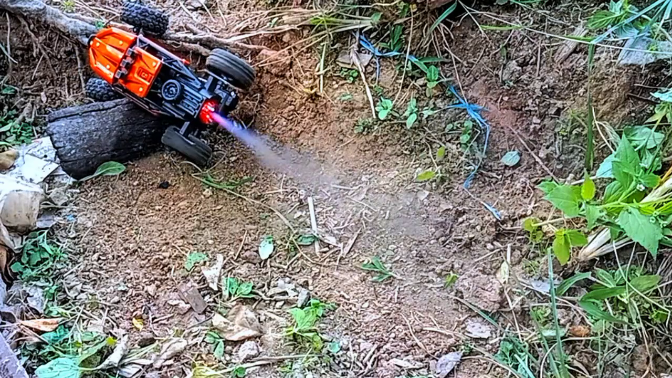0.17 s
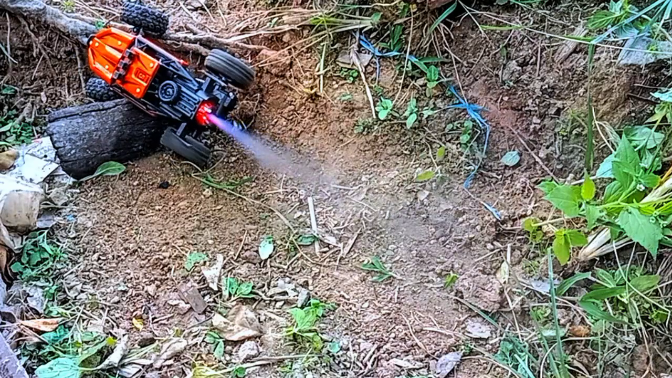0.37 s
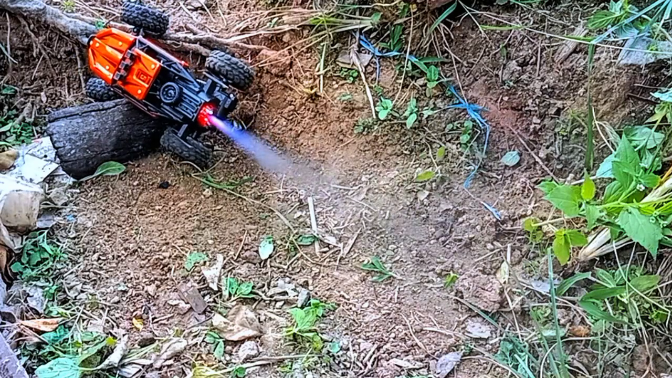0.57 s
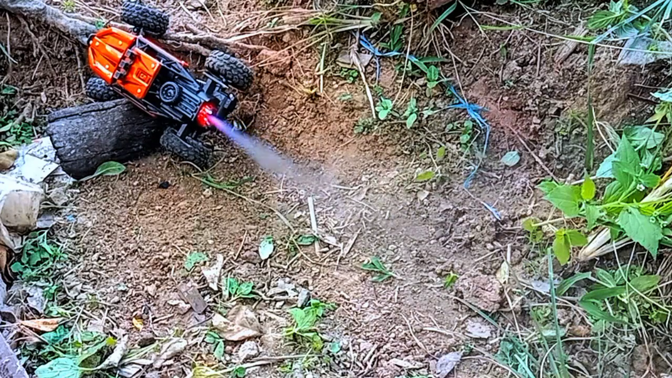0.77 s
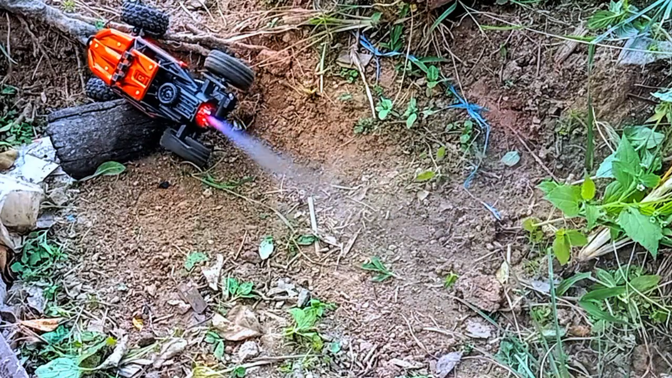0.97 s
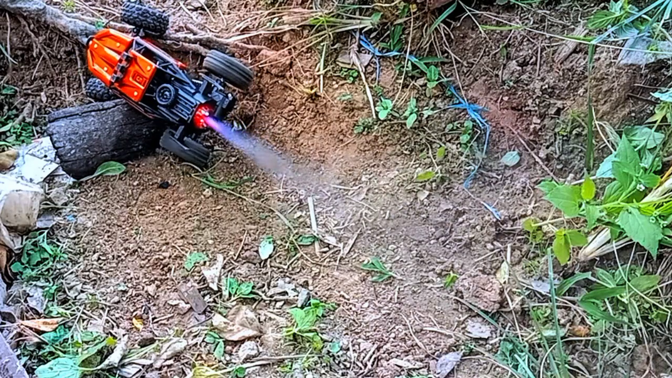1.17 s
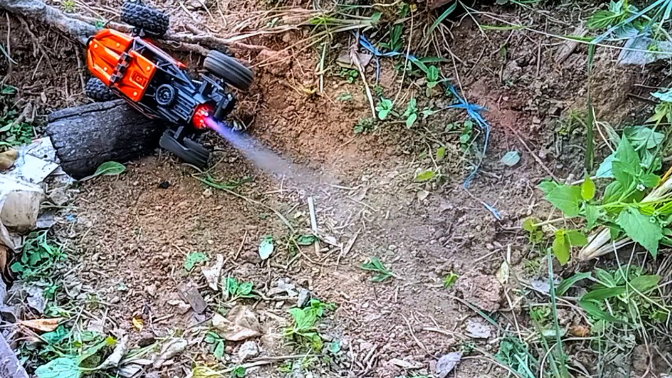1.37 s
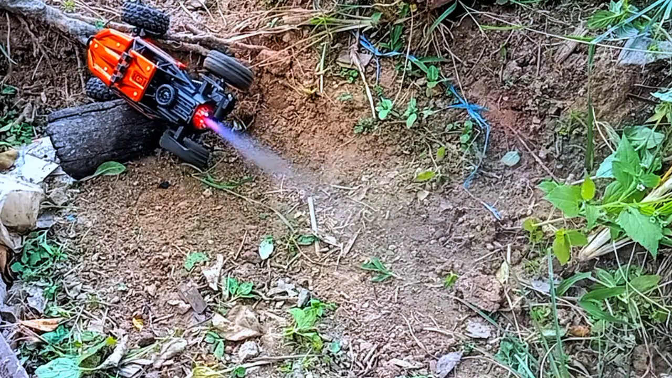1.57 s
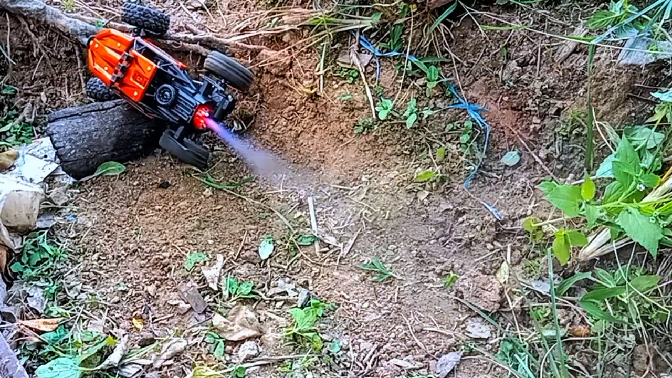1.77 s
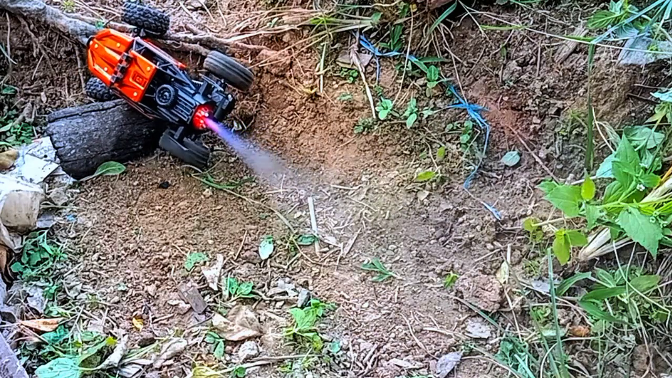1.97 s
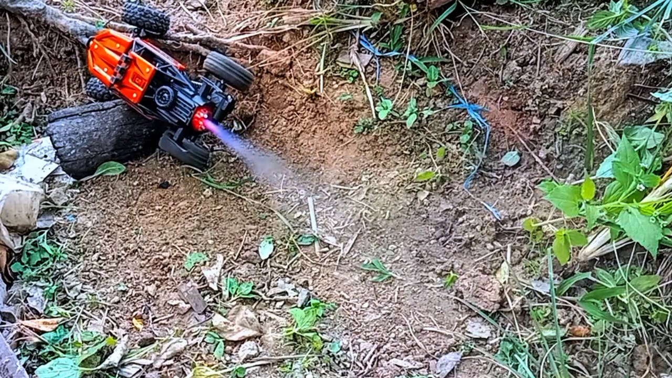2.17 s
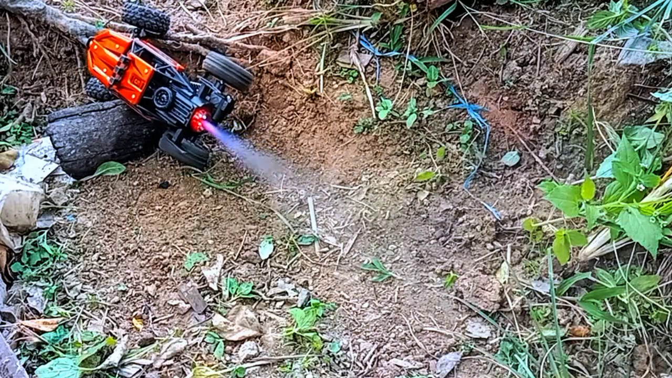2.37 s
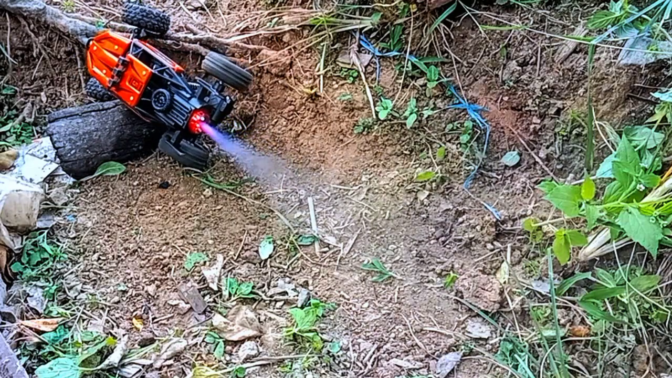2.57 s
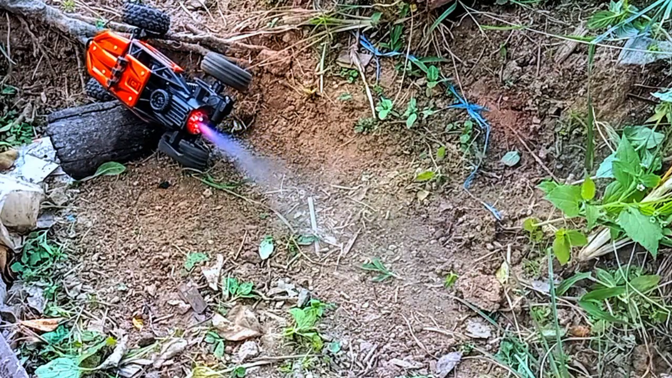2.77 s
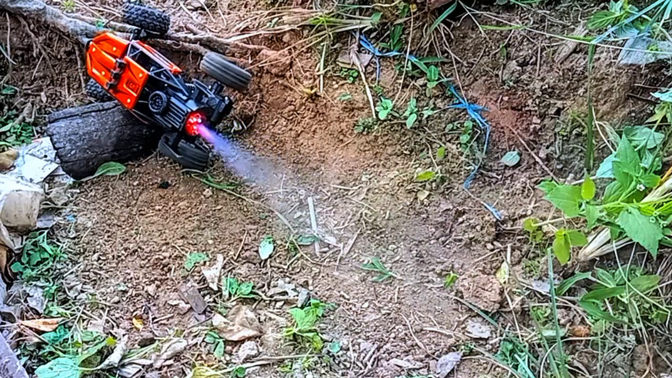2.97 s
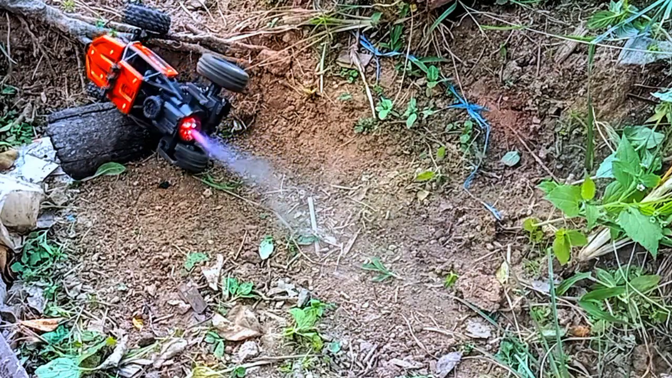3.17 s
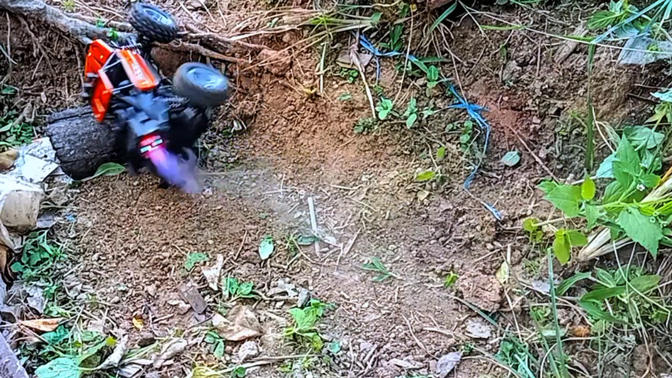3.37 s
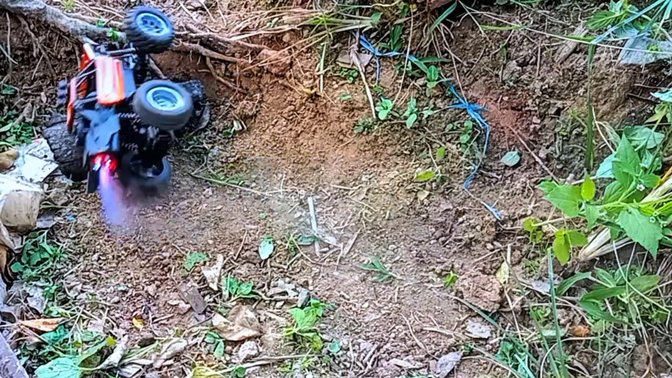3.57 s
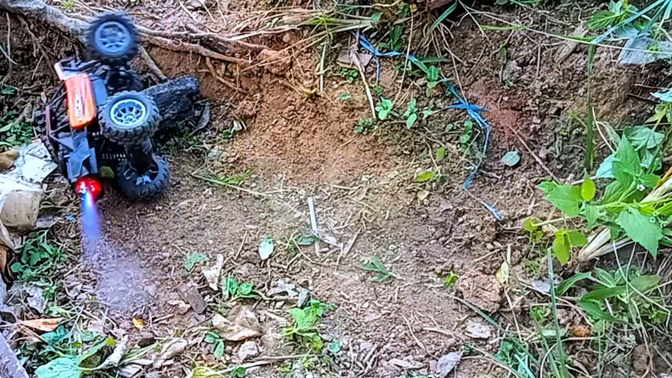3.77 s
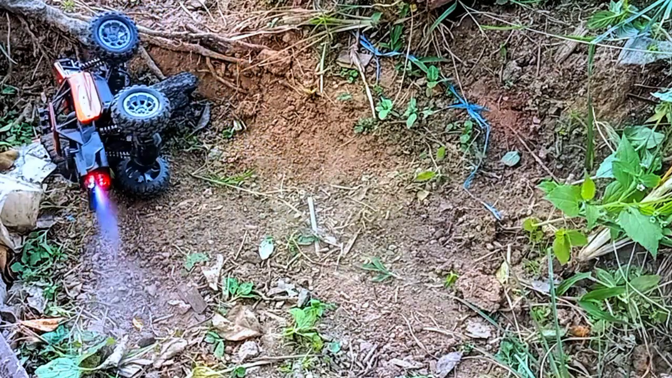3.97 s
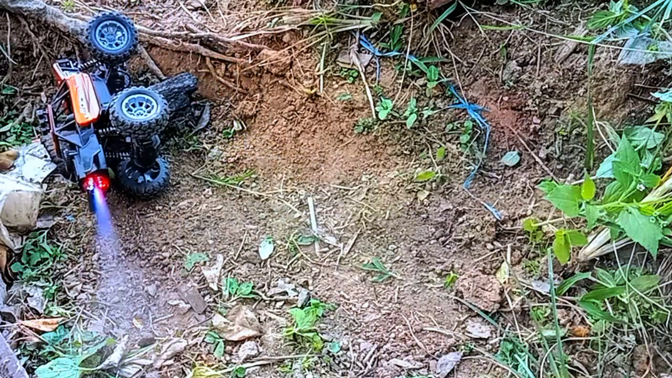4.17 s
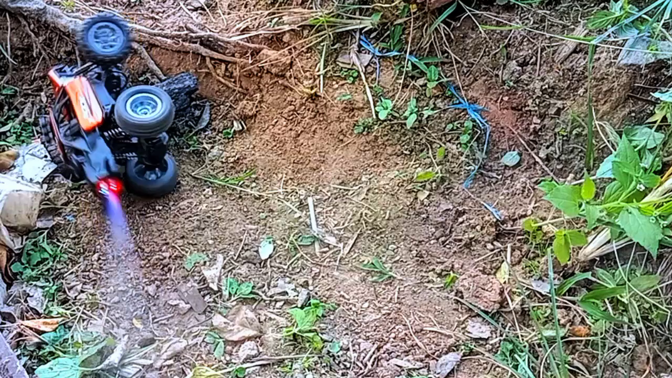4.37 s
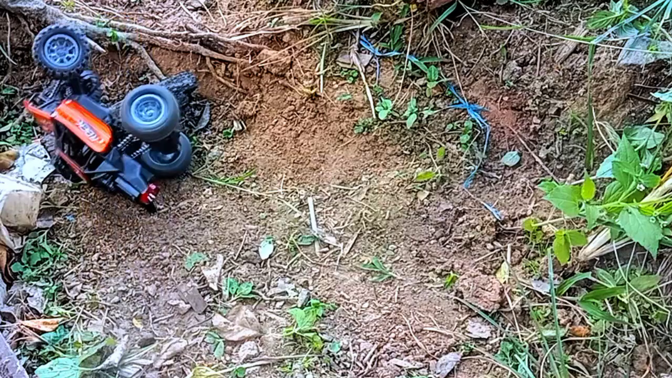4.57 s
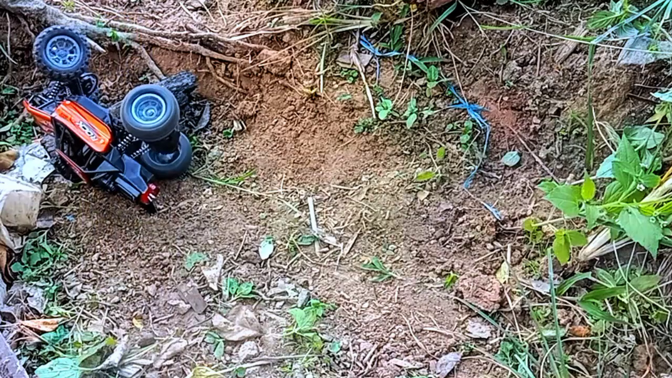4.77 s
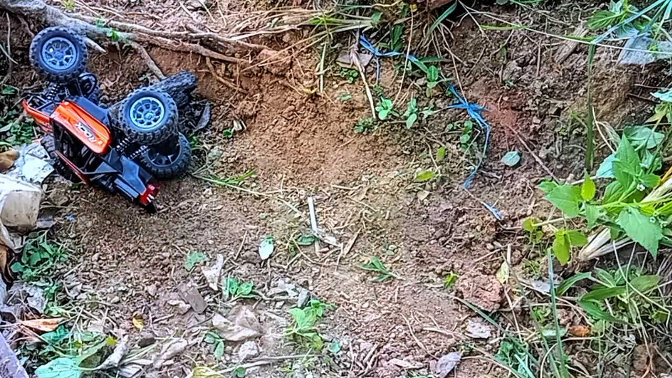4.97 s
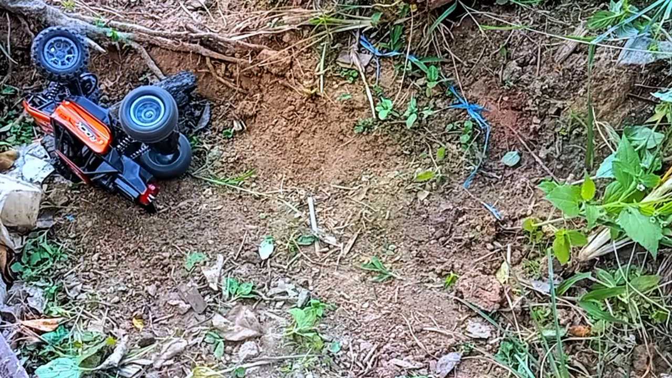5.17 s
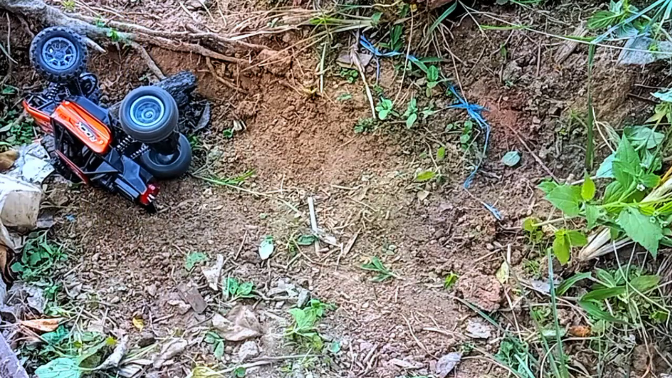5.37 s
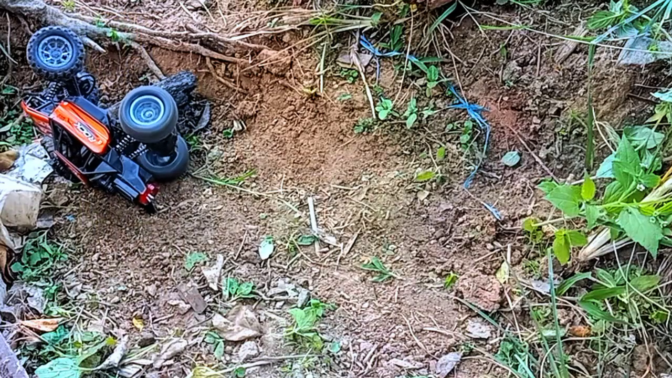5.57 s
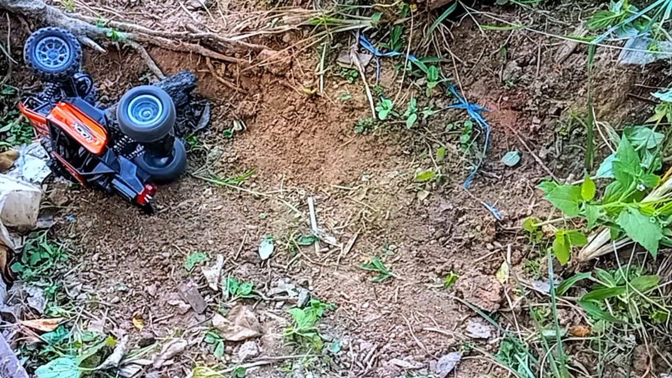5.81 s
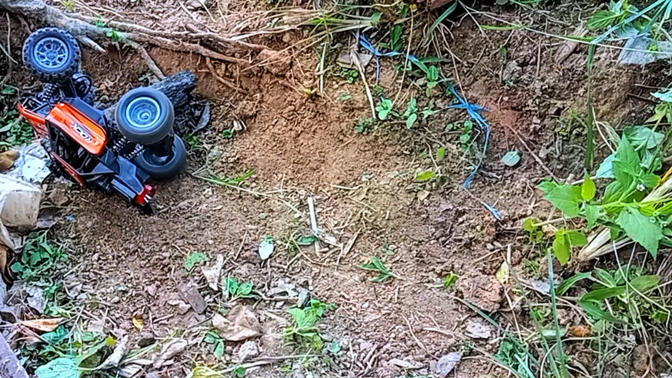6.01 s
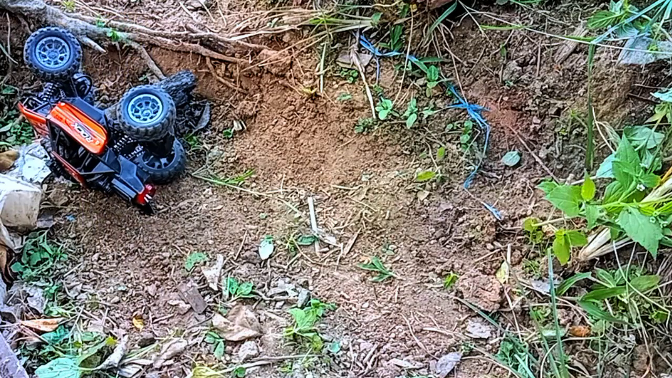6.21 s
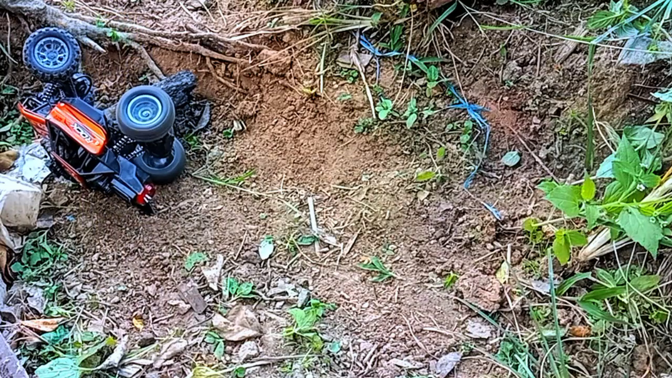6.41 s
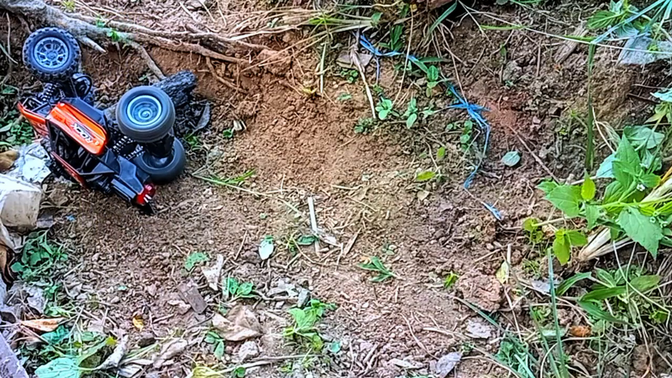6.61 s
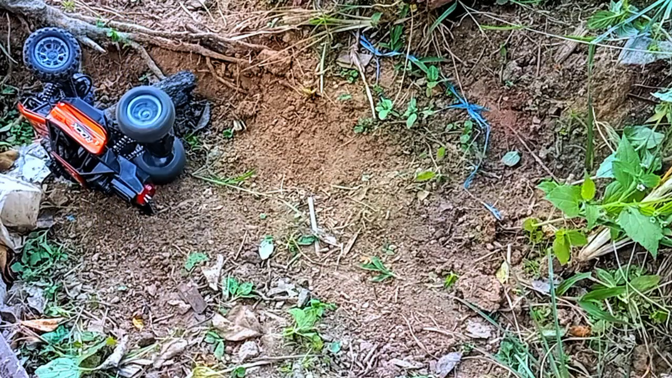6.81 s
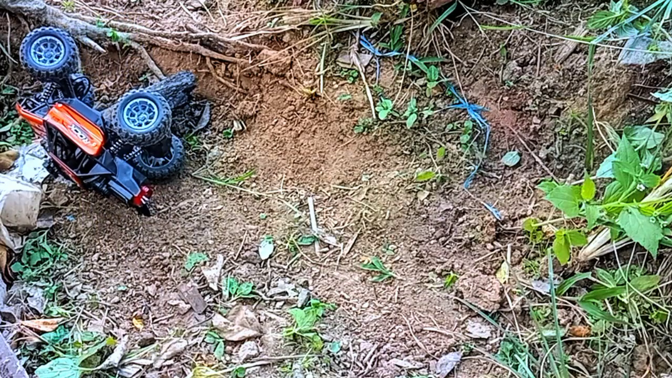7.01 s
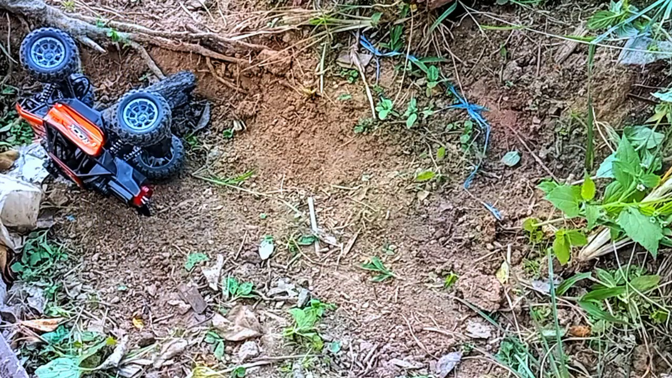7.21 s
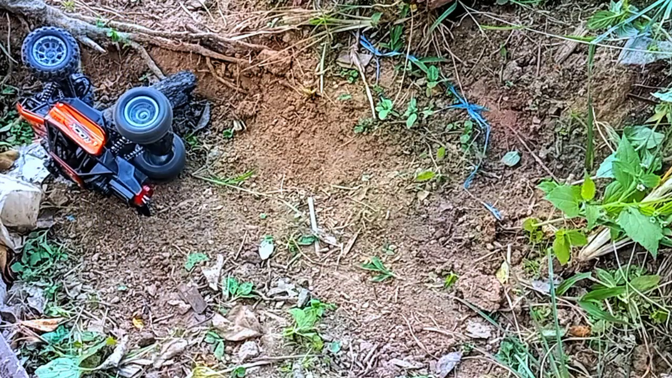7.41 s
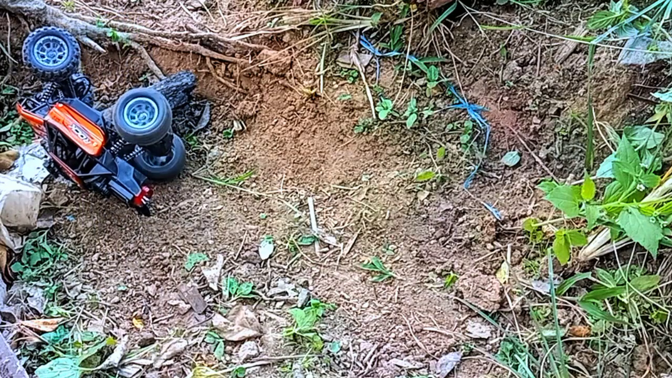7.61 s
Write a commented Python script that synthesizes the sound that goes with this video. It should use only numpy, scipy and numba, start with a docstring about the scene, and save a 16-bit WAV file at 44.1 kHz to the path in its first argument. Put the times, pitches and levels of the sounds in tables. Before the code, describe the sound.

A small electric toy crawler's plastic gears grind and rattle harshly, thump as it rolls over, then whir in short bursts over faint insects outdoors.

```python
"""On a dirt bank a small electric toy crawler strains, rolls onto its side and spins its wheels in bursts.
Gears: random tooth clicks and rubbing noise through shell and gearbox resonances, throbbing once a shaft turn.
Chassis thumps are noise-roughened gliding tones; loose parts tick as cracks with decaying modes; mesh whine
glides with the motor. Behind: filtered-noise ground rumble, faint sine tones, quiet air and a cicada chorus
of grainy noise bands."""
import sys
import numpy as np
from scipy import signal
from scipy.fft import rfft, irfft
from scipy.io import wavfile
from scipy.ndimage import uniform_filter1d
from numba import njit

SR = 44100
rng = np.random.default_rng(int(sys.argv[2]) if len(sys.argv) > 2 else 0)


def dump(signal):
    """Clip the signal to [-1, 1] and save it as 16-bit WAV at the path in sys.argv[1]."""
    limited = np.clip(np.atleast_2d(signal).T, -1, 1)
    pcm = np.round(limited * 32767).astype(np.int16)
    wavfile.write(sys.argv[1], SR, pcm)


N = 337365
T = np.arange(N) / SR
F = np.fft.rfftfreq(N, 1 / SR) + 1


def undb(db):
    """dB to amplitude."""
    return 10 ** (np.asarray(db) / 20)


def unit(x):
    """Scale to RMS 1."""
    return x / np.sqrt(np.mean(x ** 2))


def noise():
    """White noise, full length."""
    return rng.standard_normal(N)


def shape_spectrum(x, points):
    """Filter by (freq_hz, gain_db) points, interpolated over log frequency."""
    freq_hz, gain_db = np.transpose(points)
    return irfft(rfft(x) * undb(np.interp(np.log(F), np.log(freq_hz), gain_db)), N)


def ring(x, freq_hz, width_hz):
    """One resonance, gain 1 at its centre."""
    return signal.lfilter(*signal.iirpeak(freq_hz, freq_hz / width_hz, fs=SR), x)


def band(x, lo_hz, hi_hz):
    """Butterworth band-pass."""
    return signal.sosfilt(signal.butter(4, [lo_hz, hi_hz], "bandpass", fs=SR, output="sos"), x)


def walk(rate_hz):
    """Random levels held 1 / rate_hz and slewed twice."""
    hold = int(SR / rate_hz)
    steps = np.repeat(rng.standard_normal(N // hold + 1), hold)
    return 0.76 * uniform_filter1d(uniform_filter1d(steps, hold), hold)[:N]


# air noise spectrum: (freq_hz, relative_db)
AIR_SPECTRUM = [(25, -15), (50, -21), (150, -5), (380, -20), (800, -21.5), (2500, -29), (5500, -36),
                (9000, -43.5), (15600, -43)]
# cicada song bands: (low_hz, high_hz, mid_level_db)
CICADA_BANDS = [(6100, 6770, -50.5), (7000, 8300, -68), (12000, 13300, -82.5)]


def garden():
    """Quiet air noise; each cicada band is noise made grainy by fast level changes."""
    out = unit(shape_spectrum(noise(), AIR_SPECTRUM)) * undb(-68 + 2.4 * walk(2.1))
    for lo_hz, hi_hz, level_db in CICADA_BANDS:
        song = band(noise() * undb(3 * walk(250)), lo_hz, hi_hz)
        out = out + unit(song) * undb(level_db + 1.8 * walk(12))
    return out


# thin faint tones: (start_s, length_s, pitch_hz, mid_level_db)
FAINT_TONES = [(0., .1, 1350, -60), (.76, .17, 1720, -56), (3.72, .5, 775, -70), (5.26, .11, 1400, -39),
               (5.44, .27, 880, -57), (7.4, .25, 775, -66), (7.53, .1, 1450, -53)]


def tones():
    """Faint sines, wavering in level and phase, that fade in and out."""
    out = np.zeros(N)
    for start_s, length_s, pitch_hz, level_db in FAINT_TONES:
        gain = undb(level_db + 4.0 * walk(40))
        u = np.clip((T - start_s) / length_s, 0, 1)
        fade = np.sqrt(np.sin(np.pi * u).clip(0))
        out += gain * fade * np.sin(2 * np.pi * pitch_hz * T + 1.5 * walk(60))
    return out


# motor runs: (start_s, spin_up_s, up_level_db, cut_s, cut_level_db, coast_s, stop_level_db)
MOTOR_RUNS = [(-.4, .1, -30, -.1, -30, .13, -65), (.14, .126, -27.5, .538, -24, .05, -50),
              (.868, .15, -25, 3.656, -22, .06, -42), (4.295, .145, -25, 4.69, -26.5, .04, -42),
              (4.64, .07, -32.5, 4.885, -29.5, .1, -46), (5.075, .04, -34, 5.35, -23.5, .17, -45),
              (5.515, .085, -22.5, 6.125, -21.5, .1, -44), (6.375, .05, -23.5, 6.9, -21.5, .075, -56),
              (7.262, .02, -38, 7.48, -24, .15, -43)]
SILENT_DB, START_DB, CATCH_S, HALT_S = -92, -50, .045, .055
CUT_DROP_DB, CUT_DROP_S = -10, .015


def motor_db():
    """Gear level: each run catches, spins up, holds, drops at the power cut, coasts and halts."""
    out = np.full(N, SILENT_DB * 1.)
    for start_s, up_s, up_db, cut_s, cut_db, coast_s, stop_db in MOTOR_RUNS:
        stop_s = cut_s + coast_s
        times_s = [start_s - CATCH_S, start_s, start_s + up_s, cut_s, cut_s + CUT_DROP_S, stop_s, stop_s + HALT_S]
        levels_db = [SILENT_DB, START_DB, up_db, cut_db, cut_db + CUT_DROP_DB, stop_db, SILENT_DB]
        out = np.maximum(out, np.interp(T, times_s, levels_db))
    return out


FULL_DB = -24  # gear level taken as full speed
# share: rumble dB per dB of gear level
DEEP_FULL_DB, UPPER_FULL_DB, DEEP_REST_DB, UPPER_REST_DB, RUMBLE_SHARE = -62, -57.5, -85, -80, .6
# swells added to the rumble: (start_s, length_s, deep_db, upper_db)
RUMBLE_SWELLS = [(.22, .4, -42, -59), (2.3, .4, -44, -56), (3.05, .33, -48, -56), (5.1, .15, -70, -49),
                 (6.42, .15, -80, -46), (6.6, .3, -58, -58), (7.33, .15, -80, -49)]


def rumble():
    """Ground rumble under the wheels: two low noise bands that follow the gear level and swell."""
    follow = undb(RUMBLE_SHARE * (uniform_filter1d(motor_db(), size=3000) - FULL_DB))
    deep_gain = undb(DEEP_FULL_DB) * follow + undb(DEEP_REST_DB)
    upper_gain = undb(UPPER_FULL_DB) * follow + undb(UPPER_REST_DB)
    for start_s, length_s, deep_db, upper_db in RUMBLE_SWELLS:
        swell = np.sin(np.pi * np.clip((T - start_s) / length_s, 0, 1)) ** 2
        deep_gain = deep_gain + undb(deep_db) * swell
        upper_gain = upper_gain + undb(upper_db) * swell
    deep, upper = unit(band(noise(), 58, 110)), unit(band(noise(), 100, 173.6))
    return deep * deep_gain + upper * upper_gain * undb(1.0 * walk(7.7))


# turns on which the teeth slam together: (start_s, strength_db)
TOOTH_SLAMS = [(0.2319, -22), (0.2553, -7.5), (0.28, -8), (0.362, -1), (0.8944, -26), (1.0954, -8),
               (1.1468, -1), (1.1782, -14), (1.3925, -1), (1.6117, -9), (1.6905, -3), (1.926, -12),
               (2.0308, -6), (2.135, -7), (2.2508, -8), (2.3032, -4), (2.5341, -6), (2.7018, -7),
               (2.7322, -7), (2.793, -7), (2.8928, -10), (2.9996, -10), (3.2734, -3), (3.5039, -4),
               (3.5334, -9), (4.2871, -35), (4.4344, -12), (4.521, -5), (4.5644, -10), (4.7637, -17),
               (5.2394, -14), (5.3087, -8), (5.343, -15), (5.7699, -2), (5.862, -10), (5.894, -6),
               (5.919, -4), (5.9544, -3), (6.0533, -6), (6.4224, -28), (6.6092, -9), (6.6997, -6),
               (6.726, -4), (6.8188, -13), (7.2638, -34), (7.3222, -11), (7.4393, -12)]
SLAM_RISE_S, SLAM_DECAY_S, LULL_DEPTH, LULL_S = .004, .007, .6, .0071


def slams():
    """Envelope of the slams, and the lull while the slack is taken up before each."""
    hit, lull, t = np.zeros(N), np.ones(N), T[:3000]
    envelope = (1 - np.exp(-t / SLAM_RISE_S)) * np.exp(-t / SLAM_DECAY_S)
    for start_s, strength_db in TOOTH_SLAMS:
        i = int(start_s * SR)
        hit[i:i + 3000] += undb(strength_db) / 4 * envelope
        lull[i - 3000:i] *= 1 - LULL_DEPTH * np.exp(-t[::-1] / LULL_S)
    return hit, lull


# shaft speed before fitting to the slams: (time_s, turns_per_s)
SHAFT_SPEED = [(0, 40), (1.25, 39.5), (1.6, 40.5), (2.3, 40), (2.76, 32), (3.2, 30), (4.4, 38), (5.4, 36),
               (5.6, 31), (6.2, 31), (6.4, 35), (7.65, 38)]


def shaft_phase():
    """Turns of the shaft, stretched so that a whole number fits between slams."""
    free = np.cumsum(np.interp(T, *np.transpose(SHAFT_SPEED))) / SR
    at_slam = np.interp(np.transpose(TOOTH_SLAMS)[0], T, free)
    whole = np.cumsum(np.r_[0, np.maximum(np.round(np.diff(at_slam)), 1)])
    last = whole[-1] + free[-1] - at_slam[-1]
    # + 100 keeps the phase positive
    return np.interp(free, np.r_[0, at_slam, free[-1]], np.r_[-at_slam[0], whole, last]) + 100


def throb():
    """The teeth load up once a turn and let go, each turn with its own strength; a short knock sits inside."""
    phase = shaft_phase()
    turn, p = phase.astype(int), phase % 1
    chance = rng.standard_normal((1000, 2))
    pulse = np.sin(np.pi * p ** 0.88) ** 0.68 * undb(2.5 * chance[turn, 0])
    knock = np.sin(np.pi * p ** .7) ** 4 * undb(1.5 * chance[turn, 1])
    return pulse / pulse.mean(), knock


def rattle():
    """Dense tooth clicks of scattered size over rubbing noise."""
    size = undb(np.minimum(4.5 * rng.exponential(size=N), 15))
    clicks = (rng.random(N) < 1500 / SR) * size * rng.choice([-1, 1], N)  # mean 1500 per s
    rubbing = noise() * undb(2.1 * walk(150))
    return unit(rubbing + .65 * unit(clicks))


# broad gear spectrum: (freq_hz, relative_db)
GEAR_SPECTRUM = [(410, -62), (700, -30.5), (884, -20), (1340, -1.5), (2080, 5), (4040, 4.5), (5890, 4.5),
                 (6880, 10), (7840, 2), (9400, -30.5), (15600, -22.5)]
# shell modes, wheels loaded / free: (freq_hz, half_width_hz, mid_gain_db)
LOADED_MODES = [(2660, 230, -6), (3800, 500, 2.5), (5350, 49, -1.5), (6650, 150, -23.5), (8195, 97, -14.5)]
FREE_MODES = [(2650, 200, -1.5), (3340, 150, 2), (4160, 220, 0.5), (5260, 340, -2), (6600, 900, -9)]


def shell_modes(x, modes):
    """Parallel shell resonances, each wandering in level."""
    out = 0
    for freq_hz, half_width_hz, gain_db in modes:
        out = out + undb(gain_db + 4.7 * walk(30)) * ring(x, freq_hz, 2.0 * half_width_hz)
    return out


def shell(x, rolled):
    """The shell rings at other modes once the car lies on its side."""
    loaded, free = shell_modes(x, LOADED_MODES), shell_modes(x, FREE_MODES)
    return 1.094 * shape_spectrum(x, GEAR_SPECTRUM) + (1 - rolled) * loaded + rolled * free


# narrow low modes that ring by turns: (freq_hz, width_hz, mid_gain_db)
GEARBOX_MODES = [(675, 44, -18.5), (904, 38, -2), (1008, 72, -7), (1207, 73, -1.5), (1360, 124, 3.5),
                 (1487, 83, -6), (1667, 41, 0), (1894, 26, 4), (2124, 27, 2)]


def gearbox(teeth):
    """Narrow low resonances of the gearbox, each wandering in level."""
    out = 0
    for freq_hz, width_hz, gain_db in GEARBOX_MODES:
        out = out + undb(gain_db + 7.7 * walk(22)) * ring(teeth, freq_hz, width_hz)
    return out


@njit
def highpass(x, hz, damp):
    """State-variable high-pass with a moving corner; small damp rings at the corner."""
    y, b, l = np.empty(len(x)), 0., 0.
    for i in range(len(x)):
        g = np.tan(np.pi * hz[i] / SR)
        v = (b + g * (x[i] - l)) / (1 + g * (g + damp))
        low = l + g * v
        y[i] = x[i] - damp * v - low
        b, l = 2 * v - b, 2 * low - l
    return y


# gear colour before the changes for quiet gears and slams:
# (time_s, grind_re_gears_db, rasp_re_gears_db, throb_depth_0_1, low_cut_hz)
GEAR_COLOUR = [(.1, -12, 0, .3, 1000), (.27, -3.5, -4, .3, 800), (.55, -3.5, -6, .45, 800),
               (.9, -7, -4, .25, 1050), (1.1, -5.5, -5.5, .35, 870), (1.3, -7, -5, .45, 900),
               (2.45, -5.5, -6, .45, 920), (2.7, -8, -7, .45, 1200), (3.23, -8.5, -7.5, .6, 1200),
               (3.4, -14, -8, .05, 1400), (3.53, -8, -5, .2, 1100), (3.66, -8, -3, .4, 1300),
               (4.4, -17, -9, .3, 1150), (4.6, -7, -5, .35, 1150), (4.72, -15, -8, .2, 1400),
               (4.87, -5, -4, .55, 1150), (5.15, -14, -13, .2, 1500), (5.35, -16, -11, .1, 1200),
               (5.62, -11, -5, .15, 1400), (6.1, -13, -4, .35, 1350), (6.4, -20, -3, .1, 1300),
               (6.5, -3, -7, .15, 750), (6.6, -11, -2, .4, 1350), (6.9, -13, -5, .4, 1150),
               (7.3, -10, -6, .45, 1050), (7.65, -17, -11, .3, 1100)]
# shell mode struck once a turn: (freq_hz, base_width_hz, loaded_re_gears_db, free_re_gears_db)
TURN_KNOCK = (3999, 300.5, -2, -12.5)
ROLL_S = 3.42
FIZZ_LOADED_DB, FIZZ_FREE_DB = -15, -16  # re gears, at gear level -22 dB
# quieter gears throb deeper, are cut higher and have less low sound
QUIET_DEPTH_PER_DB, QUIET_LOW_CUT_HZ_PER_DB, QUIET_DROP_SHARE = .02, 22, .08
SLAM_LOW_CUT_SHARE = 4.0  # a slam lets more low sound through for a moment


def gears():
    """Throbbing rattle through shell and gearbox; grind and rasp follow GEAR_COLOUR, fizz the gear level."""
    times_s, *columns = np.transpose(GEAR_COLOUR)
    grind_db, rasp_db, depth, low_cut_hz = (np.interp(T, times_s, c) for c in columns)
    gear_db = motor_db()
    quiet_db = np.clip(FULL_DB - gear_db, 0, 30)
    depth = depth + QUIET_DEPTH_PER_DB * quiet_db
    grind_db = grind_db - QUIET_DROP_SHARE * quiet_db
    rasp_db = rasp_db - QUIET_DROP_SHARE * quiet_db
    rolled = np.clip((T - ROLL_S) * 10, 0, 1)

    teeth = rattle()
    body = shell(teeth, rolled)
    rasp = unit(band(body, 1900, 3000))
    mid = unit(band(body, 3000, 5700))
    # both scaled to 1 before the mix: upper keeps its own RMS
    upper = band(body, 6210, 8900) / np.std(mid)
    fizz = unit(band(body, 9300, 17000))
    grind = 1.28 * unit(gearbox(teeth)) + .5 * unit(band(body, 760, 1930))
    # the fizz falls faster than the gears
    fizz_db = FIZZ_LOADED_DB + rolled * (FIZZ_FREE_DB - FIZZ_LOADED_DB) + 0.083 * (gear_db + 22)

    (pulse, knock), (hit, lull) = throb(), slams()
    knock_hz, base_width_hz, loaded_db, free_db = TURN_KNOCK
    width_hz = 1.5 * base_width_hz
    struck = unit(ring(ring(teeth, knock_hz, width_hz), knock_hz, width_hz))
    out = struck * knock * undb(gear_db + loaded_db + rolled * (free_db - loaded_db))
    # (signal, re_gears_db, share of throb and slams)
    parts = ((grind, grind_db, .8), (rasp, rasp_db, .9), (mid, 0, 1), (upper, 0, .7), (fizz, fizz_db, .6))
    for part, part_db, share in parts:
        deep = np.clip(share * depth, 0, 1)
        throbbing = (1 - deep + deep * pulse) / np.sqrt(1 + .5 * deep ** 2)
        out = out + (throbbing * lull * undb(gear_db) + share * hit) * undb(part_db) * part

    slam_lowering = 1 + SLAM_LOW_CUT_SHARE * uniform_filter1d(hit, size=900)
    low_cut_hz = (low_cut_hz + QUIET_LOW_CUT_HZ_PER_DB * quiet_db) / slam_lowering * (1 + 0.18 * walk(27))
    for damp in (3.47, 1.77, 0.67, 0.42):
        out = highpass(out, low_cut_hz, damp)
    whirr = unit(band(noise(), 150, 900)) * undb(0.7 * gear_db - 41 + 3.5 * walk(20))
    return out + whirr


# hollow chassis thumps: (start_s, length_s, start_hz, end_hz, level_db)
CHASSIS_THUMPS = [(0.374, 0.033, 350, 328, -42.5), (0.404, 0.1, 602, 600, -48.5),
                  (1.716, 0.054, 474, 450, -43), (2.514, .08, 500, 465, -50), (3.448, 0.059, 341, 440, -18),
                  (3.503, 0.055, 486, 696, -30.5), (4.41, 0.14, 486, 502, -35),
                  (4.457, 0.11, 597, 656, -30), (4.431, 0.14, 1046, 1103, -33),
                  (4.576, 0.087, 615, 607, -44), (6.414, 0.098, 220, 344, -24.5),
                  (6.441, 0.095, 370, 541, -17), (6.497, 0.09, 480, 490, -32),
                  (6.578, .09, 600, 630, -43.5), (7.234, 0.084, 485, 496, -53.5),
                  (7.37, 0.097, 489, 504, -38), (7.355, 0.15, 744, 704, -44.5)]
THUMP_WIDTH_HZ, THUMP_WIDTH_PER_GLIDE = 65, .8  # a wider glide is rougher


def thumps():
    """Narrow rough swells: slow noise on a gliding carrier."""
    out = np.zeros(N)
    for start_s, length_s, start_hz, end_hz, level_db in CHASSIS_THUMPS:
        width_hz = THUMP_WIDTH_HZ + THUMP_WIDTH_PER_GLIDE * abs(end_hz - start_hz)
        u = np.arange(int(length_s * SR)) / (length_s * SR)
        k = int(SR / width_hz / 2)
        slow = uniform_filter1d(uniform_filter1d(rng.standard_normal(16384), k), k)
        rough = 1 + .5 * unit(slow)[:len(u)]
        tone = np.sin(2 * np.pi * np.cumsum(start_hz + (end_hz - start_hz) * u) / SR)
        i = int(start_s * SR)
        out[i:i + len(u)] += undb(level_db) * np.sin(np.pi * u ** 0.79) ** 2 * rough * tone
    return out


# loose parts: (start_s, level_db, crack_re_ring_db, lowest_hz, ring_time_scale); levels are relative
PART_TICKS = [(0.7003, -13, 4.5, 1900, 0.34), (3.75, -46, 2, 3200, .6), (3.932, -46, -5, 1500, 1.7),
              (4.188, -47, 5, 2110, .7), (4.766, -16, -3, 2400, .6), (5.397, -17, 10.5, 960, 0.52),
              (5.49, -20, 10, 2820, .4), (6.264, -25.5, 9.5, 1620, 0.53), (6.988, -31, 5, 2800, 0.45),
              (7.066, -50, -3.5, 1490, 0.75), (7.166, -44.5, 8, 1700, 0.56)]
# modes of the part: (freq_hz, mid_level_db, t60_s at ring_time_scale 1)
PART_MODES = [(1167, -4.5, 0.071), (1670, -5.5, 0.068), (2415, 1, 0.03), (2820, -6, .02), (3440, -6, 0.017)]


def ticks():
    """A short noise crack and the decaying modes of the part, new strengths on each tick."""
    t, out = T[:4000], np.zeros(N)
    crack_decay = np.exp(-t / 0.0049) + .06 * np.exp(-t / 0.016)
    for start_s, level_db, crack_db, lowest_hz, scale in PART_TICKS:
        strengths = undb(3.5 * rng.standard_normal(len(PART_MODES)))
        crack = rng.standard_normal(4000) * crack_decay
        modes = 0
        for strength, (freq_hz, mode_db, t60_s) in zip(strengths, PART_MODES):
            decay = 1000. ** (-t / t60_s / scale)
            modes = modes + strength * undb(mode_db) * np.sin(2 * np.pi * freq_hz * t) * decay
        tick = 0.44 * modes + 0.19 * undb(crack_db) * crack
        i = int(start_s * SR)
        out[i:i + 4000] += undb(level_db) * band(tick, lowest_hz, 7000)
    return out


# mesh whine as the motor spins up or squeals:
# (start_s, length_s, start_hz, end_hz, level_db, half_pitch_re_whine_db)
MESH_WHINES = [(3.36, .15, 2760, 2670, -20, -30), (4.32, .21, 2200, 3400, -37, -12),
               (4.69, .13, 1375, 1780, -44, -30), (5.07, .16, 2450, 2920, -45, -12),
               (5.14, .19, 1750, 2060, -41, -30), (5.54, .16, 2400, 3500, -26.5, -7),
               (6.385, .12, 2310, 3460, -32, -8)]
WHINE_FADE_DB, WHINE_BEND = -19, .7  # level at both ends; the glide slows as the motor nears its speed


def whine():
    """Rough gear mesh tone, with one at half pitch, that glides with the motor."""
    out, waver = np.zeros(N), walk(80)
    rough = .7 + uniform_filter1d(noise(), size=300) * 8
    for start_s, length_s, start_hz, end_hz, level_db, half_db in MESH_WHINES:
        on = slice(int(start_s * SR), int((start_s + length_s) * SR))
        u = ((T[on] - start_s) / length_s).clip(0, 1)
        pitch_hz = (start_hz + (end_hz - start_hz) * u ** WHINE_BEND) * (1 + 0.0051 * waver[on])
        angle = 2 * np.pi * np.cumsum(pitch_hz) / SR
        gain = undb(level_db + WHINE_FADE_DB * (2 * u ** 1.2 - 1) ** 2)
        out[on] += gain * rough[on] * (np.sin(angle) + undb(half_db) * np.sin(angle / 2))
    return out


def bank_smear(near):
    """The bank and stones send back a short decaying smear."""
    tail = rng.standard_normal(3000) * np.exp(-np.arange(3000) / SR / 0.016)
    return undb(-10.5) * signal.fftconvolve(near, tail / np.linalg.norm(tail))[:N]


def scene():
    """Crawler with its smear, over rumble, tones and garden; mono."""
    near = gears() + whine() + thumps() + ticks()
    near = near + bank_smear(near)
    return (near + rumble() + tones() + garden())[None]


TOP_HZ = 15620


def record(dry):
    """Cut the deepest bass gently and the top steeply."""
    dry = signal.sosfilt(signal.butter(2, 30, "highpass", fs=SR, output="sos"), dry)
    return signal.sosfilt(signal.ellip(14, .2, 100, TOP_HZ, fs=SR, output="sos"), dry)


dry = scene()
out = record(dry)
dump(out)
```